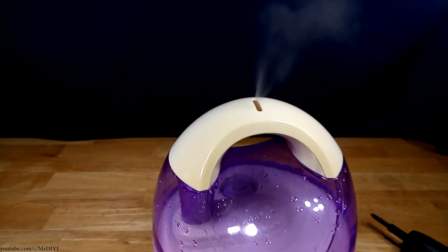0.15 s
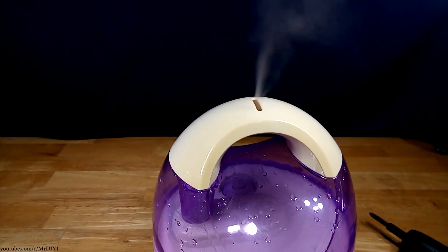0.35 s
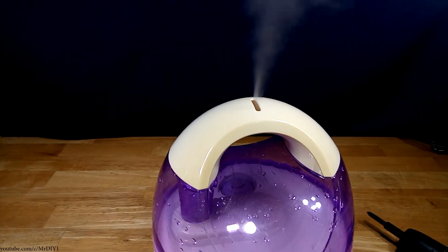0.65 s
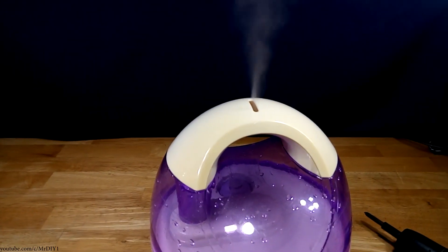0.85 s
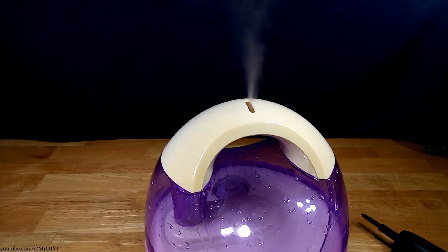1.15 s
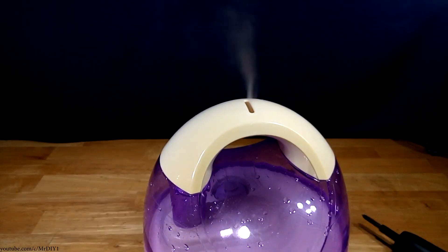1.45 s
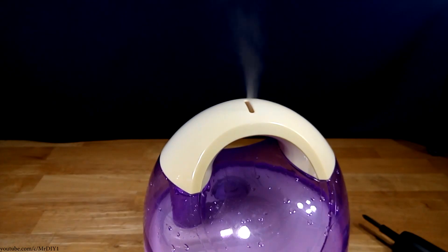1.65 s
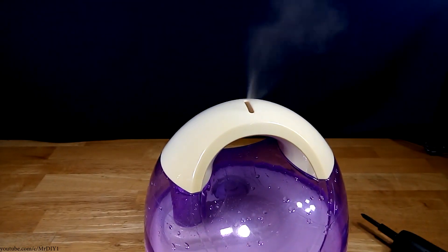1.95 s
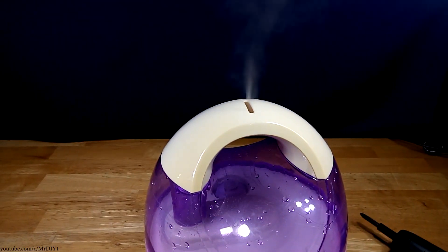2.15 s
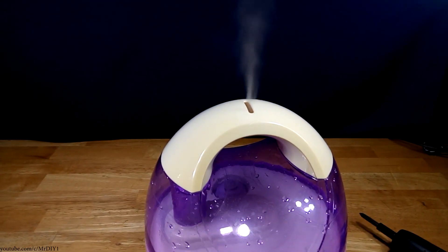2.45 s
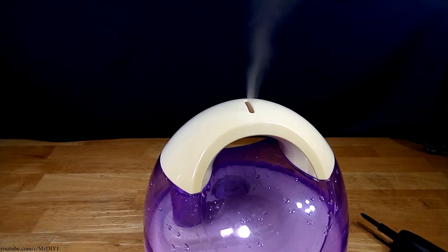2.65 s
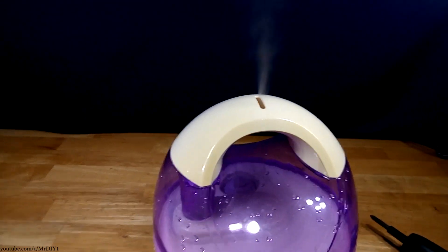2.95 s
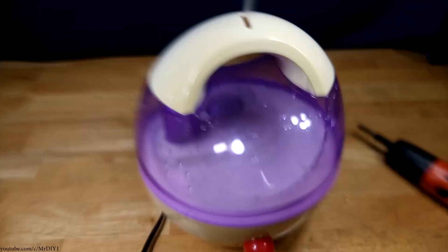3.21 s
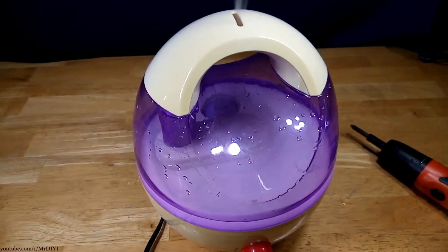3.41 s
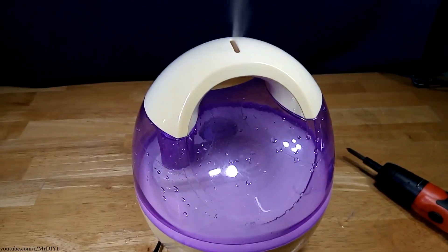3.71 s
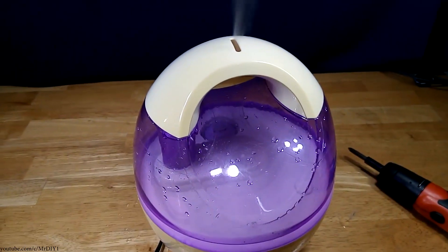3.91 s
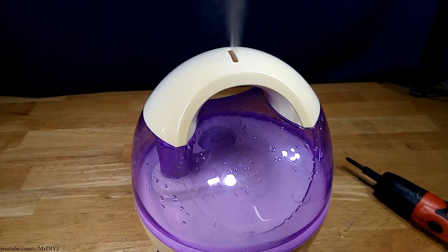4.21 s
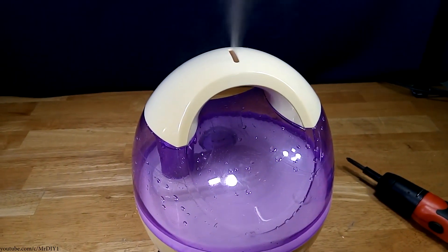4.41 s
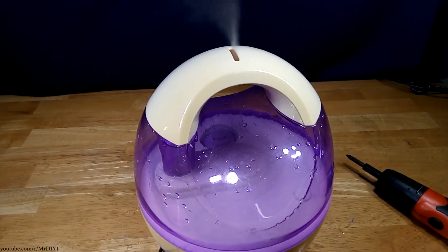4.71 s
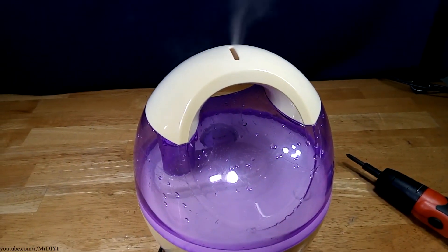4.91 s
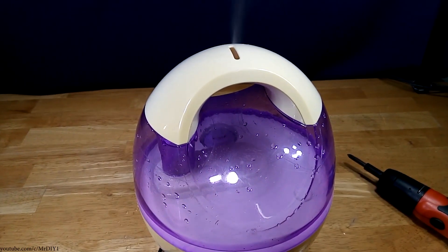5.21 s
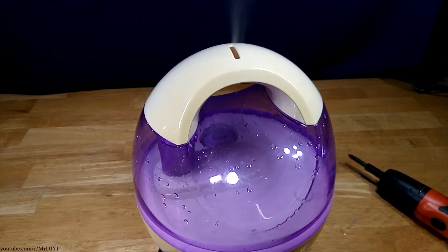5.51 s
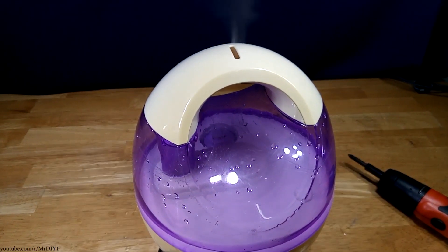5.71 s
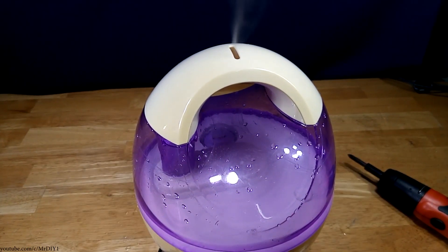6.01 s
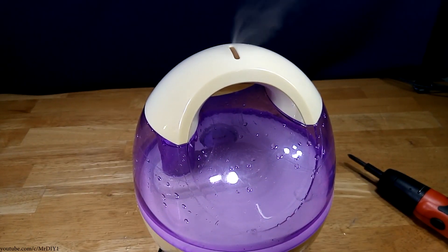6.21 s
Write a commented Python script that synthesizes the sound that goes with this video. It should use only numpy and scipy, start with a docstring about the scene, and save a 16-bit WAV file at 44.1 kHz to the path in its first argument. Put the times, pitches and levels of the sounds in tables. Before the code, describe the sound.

Throughout, a small humidifier purrs very quietly in a small room: a wavering low fan hum, airy wash and thin, fine mist hiss. From 0.1 s, faint hollow plastic knocks begin; two or three strong pops land around 0.5 s, then weaker ones and a soft rub near 1 s, with a brief low rumble and a sharper click at 1.1 s. After 1.25 s only the machine is heard. At 2.6 s a dense, gurgling flurry starts: quick hollow pops, snaps, short groaning scrapes, and a faint bright finger brush on the left around 2.8 s. It is busiest from 2.9 to 3.3 s, then breaks into scattered knocks, with a strong pop at 4.2 s and a snappy one near 4.67 s. The last falls at 4.8 s. Soft, lumpy low rumble swells around 5.3 and 5.7 s and at the close, about 6.4 s. Pops are very close, short, mostly right-sided, with little room tail.

```python
"""On a table in a small room, a little humidifier purrs: wavering fan tones, an airy wash and a thin mist hiss.
A camera close by is gripped and tilted; its mount rubs and slips in bursts of hollow pops, like gurgling.
Each pop is a burst of noise plus dying tones of the plastic body, mostly in the right microphone.
Rubs are random tiny jolts, coloured by filters; a finger brushes by as a short bright hiss.
Lumpy low noise swells briefly near one second and comes up again at the end."""
import sys
import numpy as np
from scipy import signal
from scipy.fft import rfft, irfft
from scipy.io import wavfile
from scipy.ndimage import uniform_filter1d

SR = 44100
rng = np.random.default_rng(int(sys.argv[2]) if len(sys.argv) > 2 else 0)


def dump_mix(stems):
    """Bounce the given channels to the path in sys.argv[1] as a 16-bit WAV at rate SR."""
    frames = np.atleast_2d(stems).T  # one column per channel
    limited = np.clip(frames, -1, 1)  # hard clip at full scale
    pcm = np.round(limited * 32767).astype(np.int16)
    wavfile.write(sys.argv[1], SR, pcm)


N = 280476  # length in samples
TIME = np.arange(N) / SR  # seconds


def gain(db):
    """Turns decibels into a multiplier."""
    return 10 ** (np.asarray(db) / 20)


def evened(x):
    """Scales a sound to an average strength (rms) of 1."""
    return x / np.sqrt(np.mean(x ** 2) + 1e-20)


def sized(x):
    """Scales a blow so that its energy equals 10 ms at rms 1."""
    return evened(x) * np.sqrt(SR / 100 / x.shape[-1])


def read(points, hz, axis=1):
    """Reads one column of a spectrum, joining its points along a log-frequency axis."""
    points = np.asarray(points)
    return np.interp(np.log(hz + 1), np.log(points[:, 0] + 1), points[:, axis])


def tinted(x, points):
    """Filters by a spectrum in dB: one column for all channels, or one for each microphone."""
    size = x.shape[-1]
    hz = np.fft.rfftfreq(size, 1 / SR)
    db = np.squeeze([read(points, hz, axis=k) for k in range(1, len(points[0]))])
    return irfft(rfft(x) * gain(db), size)


def swell(rows):
    """Turns a curve of levels into a gain over time that closes softly outside it."""
    times, db = np.transpose(rows)
    curve_db = np.interp(TIME, times, db, left=-120, right=-120)
    return uniform_filter1d(gain(curve_db), size=300)


def alike(a, b, likeness):
    """Mixes two independent noises so that left and right match by the given correlation."""
    c = np.clip(likeness, -1, 1)
    return np.array([a, c * a + np.sqrt(1 - c * c) * b])


def pair(likeness, size=N):
    """Makes white noise for two microphones that is partly alike."""
    a, b = rng.standard_normal((2, size))
    return alike(a, b, likeness)


def drift(hz):
    """Makes a slow random wander of rms 1 by smoothing away noise faster than about hz."""
    noise = rfft(rng.standard_normal(N))
    smoothing = np.exp(-(np.fft.rfftfreq(N, 1 / SR) / hz) ** 2)
    return evened(irfft(noise * smoothing, N))


def add(mix, s, sound):
    """Adds a stereo sound into the mix, starting at s seconds."""
    part = mix[:, max(round(s * SR), 0):][:, :sound.shape[1]]
    part += sound[:, :part.shape[1]]


# Slips of the mount, one row a knock: (time [s], force [dB], sharpness: snap over force [dB],
# depth: push into the mount over force [dB], ring length [factor; a tight grip damps])
KNOCK_EVENTS = [(0.13, -40.5, -28, -2, 1), (0.252, -32, -23, -7.5, 1.8), (0.295, -39.5, -34, 2, 1.2),
                (0.355, -30.5, -28, -18, 0.48), (0.367, -32, -24, -3, 0.76),
                (0.4881, -17, -10.5, -22, 0.83), (0.5298, -13.5, -22, -22, 0.73),
                (0.553, -22.5, -28.5, -9.5, 1.3), (0.583, -38.5, -23, -4, 0.6),
                (0.73, -31.5, -23, -22, 0.41), (0.917, -36.5, -31, -8, 0.65), (0.985, -33.5, -23, 5.5, 1.6),
                (1.008, -32, -43, 2, 1.1), (1.087, -41, -12, 5, .58), (1.1146, -22, -3.5, -6.5, 0.84),
                (1.124, -23.5, -28, -4.5, 1.2), (1.238, -33.5, -26, 0, 1.3), (2.6359, -29, -21, -4, 1.3),
                (2.648, -19.5, -8.5, 6.5, 1.47), (2.7056, -22, -21.5, -10, 0.77),
                (2.7105, -35.5, -7.5, 13.5, 2), (2.761, -27.5, -19, -9, 1), (2.847, -31.5, -13, -3, 1.5),
                (2.9046, -19, -11, -9.5, 0.62), (2.9202, -34.5, -11, 9.5, 0.53),
                (2.9411, -28, -14, -14, 1.3), (2.9785, -28.5, -7.5, 8.5, 1.4),
                (2.9877, -23.5, -16, 0.5, 2.6), (3.0081, -21.5, -17.5, -13, 0.53),
                (3.0177, -23.5, -7, -14, 0.58), (3.032, -26, -30, 3.5, 0.36),
                (3.0526, -21, -5.5, -28, 0.47), (3.152, -30, -32, -4, 0.47), (3.174, -29, -13.5, 6.5, 0.45),
                (3.1997, -28.5, -16, -3, 0.62), (3.207, -22, -17.5, 0.5, 0.72),
                (3.22, -24.5, -28, 5.5, 0.87), (3.251, -18.5, -39, -2, 1.1), (3.257, -23, -43, 6.5, 0.46),
                (3.304, -37.5, 10, 1, 0.64), (3.3077, -21, -7.5, 5.5, 0.21),
                (3.4175, -30.5, -14, 6.5, 0.78), (3.4989, -29, -21, 0, 3), (3.5198, -20.5, -0.5, 1.5, 0.64),
                (3.5704, -20.5, -9.5, -4, 0.53), (3.677, -31, -25.5, 4.5, 0.71),
                (3.7576, -30, -17, -0.5, 2.3), (3.791, -23, -6, 3.5, 1.1), (3.837, -35.5, -19, -5, .8),
                (3.9806, -27, -11.5, -13, .68), (3.996, -34, -18, -8, 0.59), (4.0148, -33.5, -21, -8, 0.75),
                (4.1963, -31.5, -15, -12, 0.97), (4.202, -15.5, -22.5, -10, 1.3),
                (4.217, -34.5, -3.5, 8, .82), (4.235, -35, -18, 5.5, 2.2), (4.298, -31.5, -11, -10, 0.45),
                (4.528, -42.5, -28, 11, 0.78), (4.641, -32, -16.5, -17, 1.2), (4.659, -43, -26, 6, 1.1),
                (4.6722, -20.5, -3, -2.5, 0.81), (4.701, -27.5, -21, 1.5, 1.1),
                (4.711, -30.5, -14.5, 5, 0.91), (4.7969, -31.5, -26, 0, 1.5)]
# What a knock rings with, before small random changes:
# (frequency [Hz], relative level [dB], time to fade 60 dB at ring length 1 [s], left minus right [dB])
THUMP_MODES = [(154, 0, 0.025, -27)]
MOUNT_MODES = [(257.2, 0, 0.05, -51)]
HOLLOW_MODES = [(357.5, -4, 0.058, -40), (451, 2, 0.028, -24)]
SHELL_MODES = [(626, 4, 0.031, -21), (783, 2, 0.024, -21), (969, 1, 0.036, -18.5),
               (1273, -3.5, 0.045, -28.5), (1395, -2, 0.017, -14)]
# a sharp knock goes more into the shell and less into the hollow (dB; dB per dB of sharpness)
SHELL_DB, SHELL_PER_SHARP = 2.5, 0.38
HOLLOW_DB, HOLLOW_PER_SHARP = -3, -0.093
# a soft knock reaches the upper shell modes less (dB per octave; the same per dB of sharpness)
SHELL_TILT_DB, TILT_PER_SHARP = 2.5, 0.18
# a deep knock also thumps (dB; dB per dB of depth)
THUMP_DB, THUMP_PER_DEPTH = -10.5, 0.75


def knocks():
    """Each slip snaps the shell; shell, hollow body and mount then ring, each with its own rise."""
    out = np.zeros((2, N))
    t = np.arange(2 ** 13) / SR
    for s, force_db, sharp_db, depth_db, length in KNOCK_EVENTS:
        shell_db = force_db + SHELL_DB + SHELL_PER_SHARP * sharp_db
        hollow_db = force_db + HOLLOW_DB + HOLLOW_PER_SHARP * sharp_db
        thump_db = force_db + THUMP_DB + THUMP_PER_DEPTH * depth_db
        tilt_db = SHELL_TILT_DB + TILT_PER_SHARP * sharp_db
        add(out, s, gain(force_db + sharp_db) * snap(t))
        # the ringing parts start a fraction of a millisecond after the snap
        shell = ring(SHELL_MODES, t, rise=0.00039, detune=0.028, length=length, tilt_db=tilt_db)
        add(out, s + 0.00013, gain(shell_db) * shell)
        hollow = ring(HOLLOW_MODES, t, rise=0.0017, detune=0.04, length=length)
        add(out, s + 0.00092, gain(hollow_db) * hollow)
        mount = ring(MOUNT_MODES, t, rise=0.005, detune=0.029, length=length)
        add(out, s + 0.00056, gain(force_db + depth_db) * mount)
        thump = ring(THUMP_MODES, t, rise=0.0013, detune=0.17, length=length)
        add(out, s + 0.00013, gain(thump_db) * thump)
    return out


# Colour of the snap, also used for the grit of a rub:
# (frequency [Hz], relative left level [dB], relative right level [dB])
SNAP_COLOUR = [(150, -25, -33), (503, 3, -27), (990, 17, -7), (1810, 5.5, 11.5), (2220, -3, 4.5),
               (2960, 4.5, 3), (4160, 1.5, 3.5), (5530, 4, -5), (6610, 2, -3.5), (8030, -14.5, -20),
               (11000, -20, -20.5), (13300, -29, -32), (14900, -13, -16), (16800, -38, -37)]
# Ping of the casing, before small random changes:
# (frequency [Hz], relative level [dB], time to fade 60 dB [s], left minus right [dB])
CASING_MODES = [(3225, 6, 0.036, -10.5), (3900, 9, 0.011, -7), (5220, 9.5, 0.02, -2.5),
                (6410, -21, 0.039, 5)]


def snap(t, decay=0.0014, rattle_db=-19, rattle_decay=0.0072, casing_db=-9, uneven_db=3):
    """Plastic letting go: a sharp crack, a short rattle and the ping of the casing."""
    noise = pair(0.03, len(t))
    attack = 1 - np.exp(-t / 0.00012)
    fading = np.exp(-t / decay) + gain(rattle_db) * np.exp(-t / rattle_decay)
    burst = tinted(noise * attack * fading, SNAP_COLOUR)
    fade_out = np.clip((t[-1] - t) / (t[-1] / 2), 0, 1)
    crack = sized(mottled(burst, depth_db=uneven_db) * fade_out)
    # the ping is drawn separately for left and right, so the two sides differ
    ping = np.array([ring(CASING_MODES, t, rise=0.00022, detune=0.012)[side] for side in range(2)])
    return crack + gain(casing_db) * ping


def mottled(x, depth_db):
    """Gives a blow its own uneven colour, as no two strike the same spot."""
    hz = np.geomspace(600, 16000, num=22)
    return tinted(x, np.column_stack([hz, depth_db * rng.standard_normal(len(hz))]))


def ring(modes, t, rise, detune, length=1, tilt_db=None):
    """Dying sine tones, a little different at each blow; the right side sets the overall size."""
    hz, db, t60, side_db = np.transpose(modes)[:, :, None]
    if tilt_db is not None:
        db = db + tilt_db * np.log2(hz / hz[0])
    pitch, weight = rng.standard_normal((2, len(modes), 1))
    sign = (-1.) ** np.arange(1, len(modes) + 1)[:, None]  # neighbours start in opposite directions
    decay_db = 60 * t / (t60 * max(length, .2))
    fading = gain(db + 4.4 * weight - decay_db) * (1 - np.exp(-t / rise))
    waves = sign * fading * np.sin(2 * np.pi * hz * (1 + detune * pitch) * t)
    left = (waves * gain(side_db)).sum(0)
    right = waves.sum(0)
    left_share = np.linalg.norm(left) / np.linalg.norm(right)
    return np.array([sized(left) * left_share, sized(right)])


# Strokes of the mount rubbing as it turns:
# (start time [s], length before dying away [s], groan level [dB], harshness: scrape over groan [dB])
RUB_STROKES = [(0.965, 0.087, -35.5, -13), (2.69, 0.033, -28.5, -8), (2.764, 0.031, -32.5, -7.5),
               (2.825, 0.055, -38.5, -6.5), (2.935, 0.053, -30.5, -0.5), (3.01, 0.027, -41, -5),
               (3.053, 0.069, -35, -6), (3.18, 0.044, -29.5, -1), (3.253, 0.023, -26.5, -12),
               (3.274, 0.014, -40.5, 4.5), (3.345, 0.017, -30, -8), (3.382, 0.024, -30.5, -5)]
# Colours of the groan and the scrape: (frequency [Hz], relative level [dB])
GROAN_COLOUR = [(30, -32), (100, -5), (190, 7), (255, 13.5), (320, 3.5), (410, 17.5), (530, -7.5),
                (800, -15), (2000, -48.5)]
SCRAPE_COLOUR = [(200, -27), (450, -13), (640, 4.5), (850, 8.5), (1100, -1), (1300, 2.5), (1520, -9.5),
                 (1800, -19), (2500, -17), (5000, -58.5)]
# Side balance of groan and scrape together: (frequency [Hz], left minus right [dB])
BODY_SIDE = [(50, 2), (200, -29), (400, -35), (700, -14), (1300, -29), (2500, 0)]


def rubbing(slips_per_s=280, groan_db=0, scrape_db=0, grit_db=-11, lumpy_db=1.0):
    """Tiny stick-slip jolts make the body groan, the shell scrape and its surface crackle."""
    jolts = (rng.random(N) < slips_per_s / SR) * rng.uniform(-1, 1, N)
    rough = evened(jolts) + 0.34 * rng.standard_normal(N)
    drive = evened(rough * gain(lumpy_db * drift(30)))
    pressure = sum(gain(db) * stroke(s, length) for s, length, db, harsh_db in RUB_STROKES)
    bite = sum(gain(db + harsh_db) * stroke(s, length) for s, length, db, harsh_db in RUB_STROKES)
    groan = evened(tinted(drive, GROAN_COLOUR)) * pressure
    scrape = evened(tinted(drive, SCRAPE_COLOUR)) * bite
    body = gain(groan_db) * groan + gain(scrape_db) * scrape
    # the crackle follows the strength of the jolts, smoothed over about 2 ms
    smoothed_power = signal.lfilter([1], [1, -np.exp(-1 / (0.0021 * SR))], drive ** 2)
    chatter = np.sqrt(abs(smoothed_power))
    grit = evened(tinted(pair(0.12) * chatter, SNAP_COLOUR)) * bite
    return np.array([tinted(body, BODY_SIDE), body]) + gain(grit_db) * grit


RUB_ATTACK_S, RUB_RELEASE_S = 0.011, 0.017


def stroke(start, length):
    """A rub builds up, holds while the mount turns, and dies away."""
    t = TIME - start
    return np.clip(t / RUB_ATTACK_S, 0, 1) * np.exp(-np.maximum(t - length, 0) / RUB_RELEASE_S)


# Lightly damped metal in the mount: (frequency [Hz], gain [dB], time to fade 60 dB [s])
METAL_MODES = [(261.4, -14.5, 0.34), (634, -12.5, 0.39), (1235, -9.5, 0.12), (1763, -2.5, 0.076),
               (2106, -3.5, 0.13), (3010, -2, 0.14)]


def afterring(x, left_db=-6):
    """Narrow resonances pick up the right-hand handling sound and sing on faintly."""
    t = np.arange(SR // 2) / SR
    hz, db, t60 = np.transpose(METAL_MODES)[:, :, None]
    fading = gain(-60 * t / t60)
    strength = 2 * gain(db) * fading / fading.sum(1, keepdims=True)
    response = (strength * np.cos(2 * np.pi * hz * t)).sum(0)
    return signal.fftconvolve(x[1], response)[:N] * gain([[left_db], [0]])


def room(x, wet_db=-21, t60=0.38):
    """A small room answers the handling with a dying tail of random reflections."""
    t = np.arange(SR // 2) / SR
    tail = rng.standard_normal((2, len(t))) * gain(-60 * t / t60) * (1 - np.exp(-t / 0.0013))
    # colour of the sound sent into the room: (frequency [Hz], level [dB])
    airborne = tinted(x.mean(0), [(100, 14.6), (400, 1.3), (1500, 2.2), (6000, 5.2), (12000, 2)])
    echo = signal.fftconvolve(airborne[None], tail / np.linalg.norm(tail[0]), axes=1)
    return gain(wet_db) * echo[:, :N]


# A finger brushing past the left microphone: (time [s], left level [dB])
BRUSH_LEVEL = [(2.74, -69), (2.765, -52), (2.79, -46), (2.845, -48), (2.865, -55), (2.88, -73)]
# Colour of the brush: (frequency [Hz], relative level [dB])
BRUSH_TINT = [(1000, -28), (3000, -14), (6000, -4), (8000, -10), (13000, -12), (15000, 6), (15800, -3),
              (16500, -25)]


def brush():
    """Skin sliding on plastic gives a brief bright hiss, 9 dB weaker on the right."""
    return evened(tinted(pair(0.16), BRUSH_TINT)) * swell(BRUSH_LEVEL) * gain([[0], [-9]])


# Low rumble as the camera is held, one list a spell: (time [s], level before the overall trim [dB])
RUMBLE_SPELLS = [
    [(.9, -64), (1.05, -47.5), (1.5, -54.5)],
    [(4.3, -52), (4.92, -51.5), (5.15, -63), (5.33, -41), (5.5, -52.5), (5.7, -40), (5.86, -48),
     (6.0, -49.5), (6.36, -43.5)],
]
# Colour of the rumble: (frequency [Hz], relative level [dB])
RUMBLE_TINT = [(20, -12), (45, -2), (70, 1.5), (115, 2), (170, -9), (300, -14), (800, -72)]


def rumble(level_db=-1, lumpy_db=3):
    """Soft low noise in both microphones, made lumpy by a slow random level."""
    low_noise = tinted(pair(0.1), RUMBLE_TINT)
    lumpy = evened(low_noise * gain(lumpy_db * drift(7.5)))
    return gain(level_db) * lumpy * sum(swell(rows) for rows in RUMBLE_SPELLS)


# The fan's airy wash: (frequency [Hz], relative left level [dB], relative right level [dB])
WASH_COLOUR = [(18, 2, -7), (60, 3.5, 5), (130, -2.5, -5.5), (195, -2, 1.5), (260, 1, -1.5), (317, 0, -2),
               (392, 1.5, -1.5), (470, -9, -4.5), (694, -4, 0.5), (1300, -3, -1.5), (1420, -2, -0.5),
               (1900, -9.5, -11.5), (2455, -4.5, -14), (4440, -36, -45)]
# How alike the wash is in both microphones: (frequency [Hz], correlation [clipped to -1..1])
WASH_MATCH = [(60, 0.26), (130, 0.99), (290, 0.71), (640, 0.5), (1410, -0.12), (3100, 0.036), (6820, 0.073),
              (15000, -1.1)]
# Fan and housing tones: (centre frequency [Hz], middle level of the two sides [dB], left minus right [dB])
HUM_TONES = [(152.6, -61, -3), (257.7, -63.5, -2), (291.8, -63.5, -8), (410, -68.5, -2), (631, -67.5, 4),
             (913, -67.5, 1), (1125, -74.5, 2), (1162, -70, -13.5), (1270, -67, 0), (1600, -71, -1),
             (1650, -71, 12), (2444, -70.5, 1), (2555, -68.5, 1)]
WASH_DB = -50


def fan(waver_hz=3.695, flutter=0.34):
    """Air through the housing is filtered noise, with weak tones wavering in pitch and level."""
    a, b = rfft(rng.standard_normal((2, N)))
    likeness = read(WASH_MATCH, np.fft.rfftfreq(N, 1 / SR))
    air = irfft(alike(a, b, likeness), N)
    out = gain(WASH_DB) * evened(tinted(air, WASH_COLOUR))
    for tone_hz, db, side_db in HUM_TONES:
        # each microphone hears the tone at a slightly different point of its cycle
        turns = np.cumsum(tone_hz + waver_hz * drift(12.4)) / SR + rng.uniform(0, 0.13, (2, 1))
        tone = evened(np.sin(2 * np.pi * turns) * (1 + flutter * drift(12.0)))
        out += gain([[db + side_db / 2], [db - side_db / 2]]) * tone
    return out


# Hiss of the mist, with a thin sheen at the very top:
# (frequency [Hz], relative left level [dB], relative right level [dB])
HISS_COLOUR = [(1490, -18, -20), (2830, 5, 5), (3740, 7, 1), (4730, 2, -3.5), (5700, 2.5, -3), (6270, 0, 0),
               (7230, -6, -6.5), (8270, -22, -19), (8900, -16, -10.5), (10000, -19, -13.5),
               (12800, -28, -4.5), (14000, -21, -19), (14240, -13, 5), (15230, -1, 11.5), (15740, -35, -12),
               (17000, -50, -50)]


def hiss(level_db=-60.0, flicker_db=0.83):
    """The fine hiss of the mist is filtered noise with a slight quick flicker."""
    flicker = gain(flicker_db * drift(90))
    return gain(level_db) * evened(tinted(pair(0.043), HISS_COLOUR) * flicker)


def scene(handling_cut_hz=70):
    """Handling noises, kept light in the deepest bass by a low cut, over the running humidifier."""
    handling_low_cut = signal.butter(2, handling_cut_hz, "highpass", fs=SR, output="sos")
    handling = signal.sosfilt(handling_low_cut, knocks() + rubbing())
    handled = handling + afterring(handling) + room(handling)
    return handled + brush() + rumble() + fan() + hiss()


EDGE_HZ = 16750  # upper band limit


def record(dry, low_cut_hz=38):
    """The recorder's low cut thins the deepest bass and its band limit removes the very top."""
    low_cut = signal.butter(2, low_cut_hz, "highpass", fs=SR, output="sos")
    thinned = signal.sosfilt(low_cut, dry)
    band_limit = signal.firwin(511, EDGE_HZ, window=("kaiser", 9), fs=SR)
    return signal.oaconvolve(thinned, band_limit[None], "same")


dry = scene()
out = record(dry)
dump_mix(out)
```